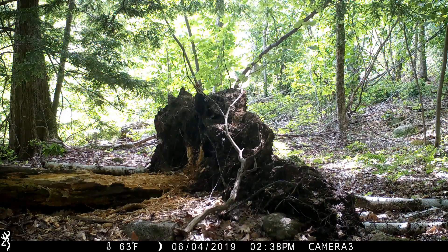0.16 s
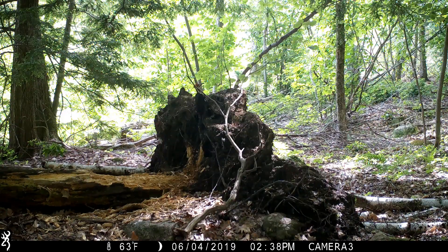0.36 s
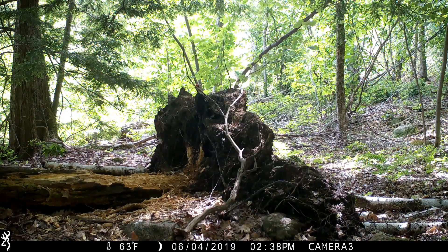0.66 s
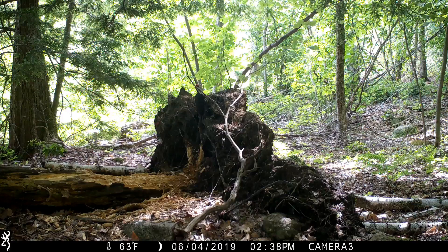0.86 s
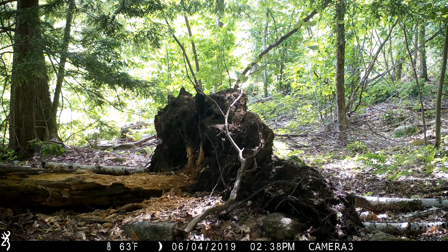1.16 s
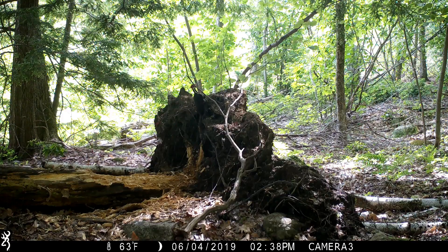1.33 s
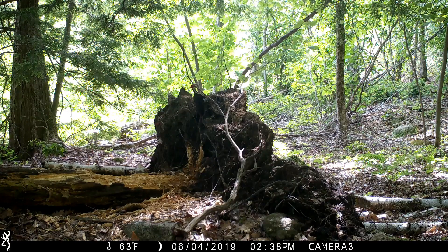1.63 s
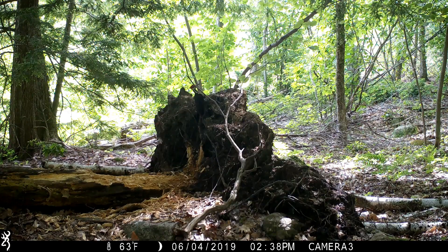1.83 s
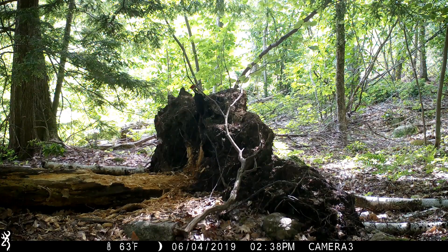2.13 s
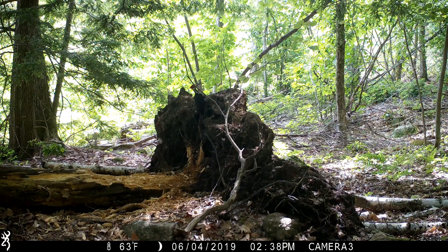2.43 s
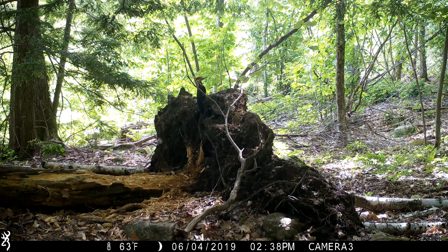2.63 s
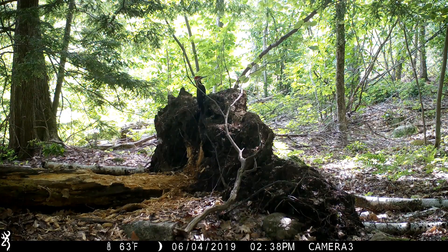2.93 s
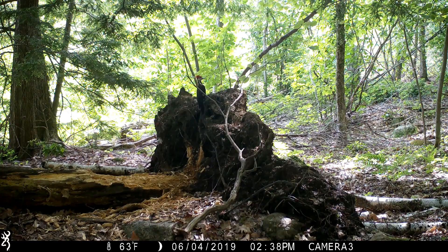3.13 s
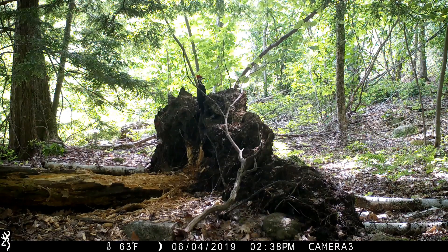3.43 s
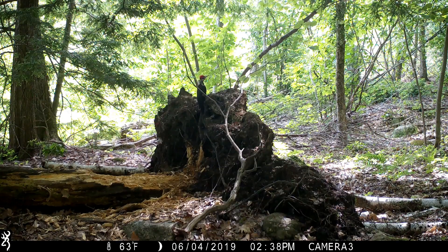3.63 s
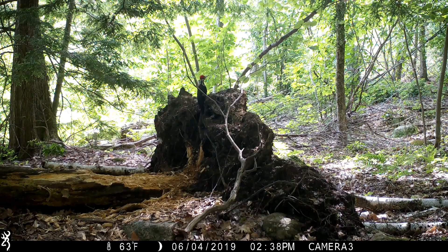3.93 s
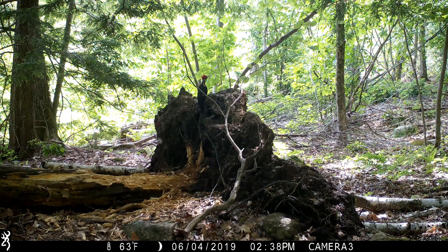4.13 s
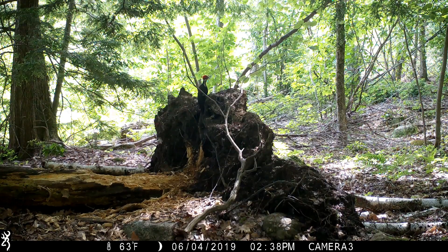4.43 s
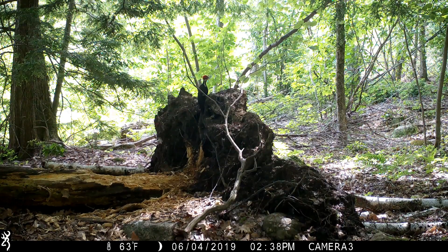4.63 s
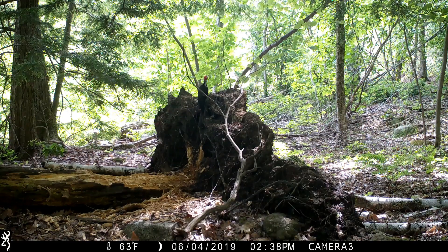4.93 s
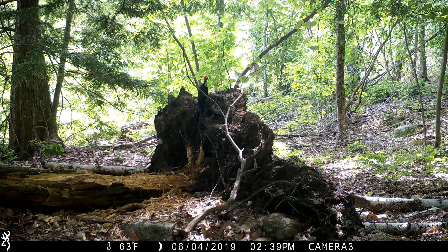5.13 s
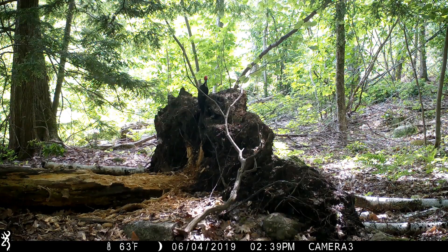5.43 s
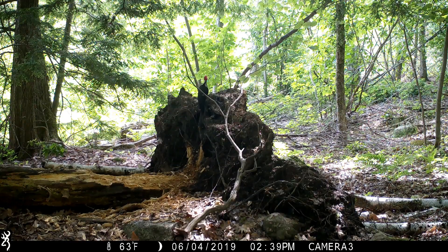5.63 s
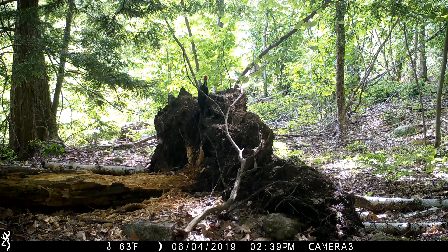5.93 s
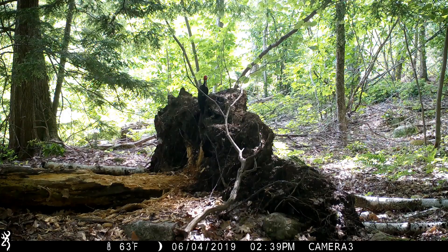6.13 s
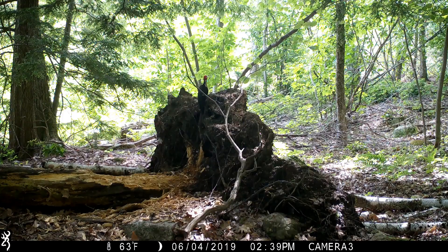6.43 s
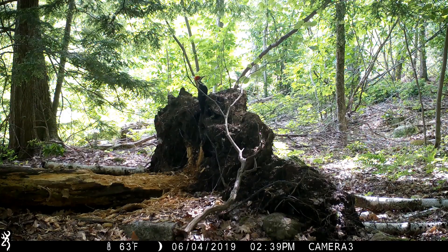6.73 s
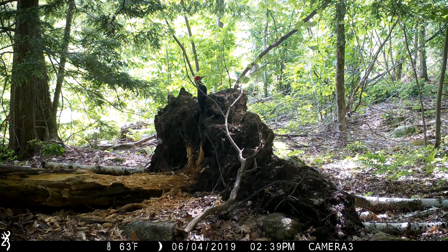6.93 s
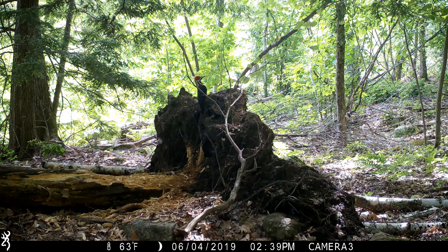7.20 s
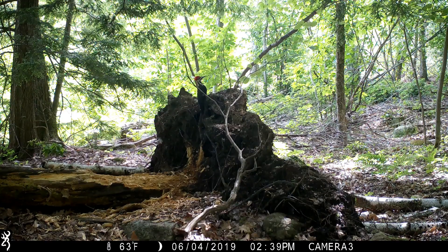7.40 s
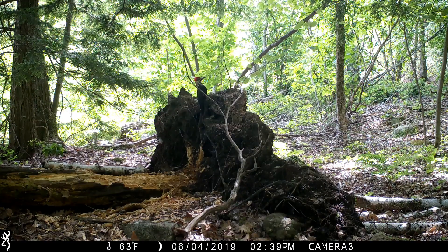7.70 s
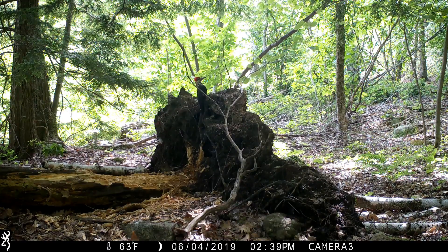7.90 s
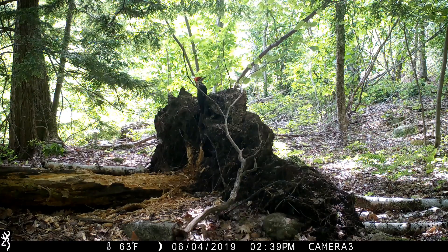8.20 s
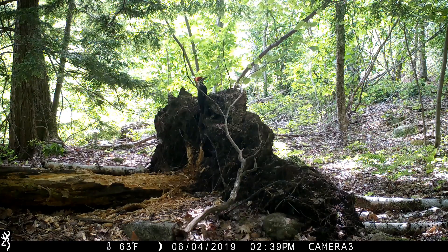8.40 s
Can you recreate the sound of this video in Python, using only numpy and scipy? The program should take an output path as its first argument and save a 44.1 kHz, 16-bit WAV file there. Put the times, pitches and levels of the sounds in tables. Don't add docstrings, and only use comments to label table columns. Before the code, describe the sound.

After faint hiss, distant bird whistles and tiny twig snaps, a large woodpecker gives a loud, rapid, even series of arched notes echoing among trees.

```python
import sys
import numpy as np
from scipy import signal
from scipy.fft import rfft, irfft, next_fast_len
from scipy.io import wavfile
from scipy.ndimage import uniform_filter1d, map_coordinates

SR = 44100
rng = np.random.default_rng(int(sys.argv[2]) if len(sys.argv) > 2 else 0)


def magnitude_from_level(level_db):
    exponent = np.asarray(level_db, float) / 20
    return 10 ** exponent


def wav_out(sig):
    wavfile.write(sys.argv[1], SR, np.round(np.clip(np.atleast_2d(sig).T, -1, 1) * 32767).astype(np.int16))


N = 377496
SAMPLING_HZ = 8000

# start [t/s], top pitch [f/Hz], fundamental [level/dB],
# octave over the fundamental [level/dB], which tells how forceful the note is
CALL_NOTES = [(3.1181, 1055, -24, -5), (3.4293, 1000, -23.5, -6.5), (3.6356, 997.3, -22.5, -1.5),
              (3.8359, 993, -21.5, -1.1), (4.016, 997, -23.5, 1.5), (4.201, 986, -23.5, 0.5),
              (4.3844, 995, -22.5, -0.1), (4.5665, 1000, -23.5, 1), (4.7552, 1000, -22.5, 0.5),
              (4.937, 1001, -23, 2.5), (5.1193, 1007, -23, 2), (5.291, 1010, -22.5, 1.5),
              (5.463, 1010, -22.5, 2.5), (5.6365, 1004, -22.5, 2), (5.8104, 991, -22.5, 1.5),
              (5.9947, 987, -23.5, 3), (6.1705, 1000, -22.5, 3), (6.353, 987, -23, 3.5),
              (6.529, 999, -23, 3), (6.6958, 1002, -23, 4.5), (6.8669, 994, -23, 3), (7.037, 996, -23.5, 4),
              (7.2091, 991, -23, 3.5), (7.384, 981.4, -23.5, 3), (7.5523, 994, -23, 3.5),
              (7.7252, 981, -23.5, 3), (7.9014, 984, -23, 3), (8.078, 982, -22, 2.5),
              (8.2498, 1000, -21.5, 3.5), (8.4347, 984, -22.5, 2)]


def rms_one(x):
    return x / np.sqrt(np.mean(x ** 2) + 1e-20)


def wobble(hz, size):
    r = np.exp(-2 * np.pi * hz / SR)
    noise = rng.standard_normal(size + 2000)
    return rms_one(signal.lfilter([1], [1, -2 * r, r * r], noise)[2000:])


def resonance(x, hz, width):
    r = np.exp(-np.pi * width / SR)
    ring = [1, -2 * r * np.cos(2 * np.pi * hz / SR), r * r]
    return signal.lfilter(np.array([1, 0, -1]) * (1 - r * r) / 2, ring, x)


def add(out, s, sound):
    i = round(s * SR)
    out[i:i + len(sound)] += sound[:N - i]


def air():
    # [f/Hz], strength per Hz [level/dB]
    air_colour = [(20, -2), (60, 0), (170, -3.5), (350, -6), (600, -8.5), (1000, -12.5), (1700, -15),
                  (2600, -18), (3500, -20), (3800, -22.5), (4000, -24.5)]
    hz = np.maximum(np.fft.rfftfreq(N, 1 / SR), 1)
    table_hz, table_db = np.transpose(air_colour)
    colour = magnitude_from_level(np.interp(np.log(hz), np.log(table_hz), table_db))
    colour *= (hz < SAMPLING_HZ / 2) / np.sinc(np.minimum(hz / SAMPLING_HZ, 0.5)) ** 2
    hiss = rms_one(irfft(colour * rfft(rng.standard_normal(N)), N))
    return magnitude_from_level(-44.9 + 0.74 * wobble(1.2, size=N)) * hiss


def songbird():
    # start [t/s], length [t/s], first and last pitch [f/Hz], [level/dB]
    slurs = [(0.34, 0.029, 3480, 3150, -52), (0.377, 0.056, 3380, 3900, -55),
             (0.479, 0.045, 2910, 2740, -52), (0.515, 0.016, 3010, 2770, -50),
             (0.552, 0.045, 2570, 3260, -53), (.555, 0.043, 3460, 4000, -51.5),
             (0.586, 0.031, 3420, 3445, -51), (0.655, 0.022, 3520, 3360, -53),
             (1.425, 0.03, 4000, 3530, -50.5), (1.438, 0.0234, 3510, 3490, -51),
             (1.825, 0.028, 2960, 2560, -52), (1.864, 0.047, 3360, 3670, -49),
             (1.912, 0.053, 3550, 2540, -45.5), (1.983, 0.014, 2800, 2520, -47),
             (2.087, 0.0457, 2970, 2440, -47.5), (2.16, 0.02, 2660, 3300, -46),
             (2.179, 0.0132, 3230, 2630, -45), (2.189, .032, 2540, 2170, -57),
             (2.15, 0.026, 3540, 3900, -49), (2.18, 0.021, 3940, 3540, -57),
             (2.236, 0.023, 2540, 2610, -56), (3.616, 0.043, 3240, 3430, -47),
             (3.711, 0.04, 3090, 3370, -46), (4.83, 0.05, 2610, 2800, -54)]
    out = np.zeros(N)
    for s, length, start_hz, end_hz, db in slurs:
        u = np.linspace(0, 1, round(length * SR))
        hz = start_hz + (end_hz - start_hz) * u
        swell = np.sqrt(2 * np.sin(np.pi * u))
        add(out, s, swell * magnitude_from_level(db) * np.sin(2 * np.pi * np.cumsum(hz) / SR))
    leaf_flutter_db = 2.0
    return out * magnitude_from_level(leaf_flutter_db * wobble(120, size=N))


def woods(x, count=5):
    # delay [t/s], time to fade by 60 dB [t/s], [level/dB]
    trunks = [
        (0.035, 0.013, -20),
        (0.024, 0.7, -21),
        (0.061, 0.94, -26),
        (0.051, .06, -29),
        (0.17, 0.065, -42.5),
    ]
    # [f/Hz], [level/dB]
    echo_colour = [(500, -9), (1000, 0), (1350, -2), (1750, 1.5), (1980, 1), (2600, 4.5), (3900, 6.5),
                   (6000, -6.5)]
    forest_floor = (0.009, 0.1, -12)
    t = np.arange(2 ** 15) / SR
    envelope = 0
    for delay, t60, db in [forest_floor, *trunks]:
        cluster = magnitude_from_level(-120 * t / t60) * (1 - np.exp(-t / 0.001))
        cluster = np.interp(t - delay, t, cluster, left=0)
        envelope = envelope + magnitude_from_level(2 * db) * cluster / cluster.sum()

    shifting = 0.37
    noise = rng.standard_normal((count + 1, len(t)))
    pattern = np.sqrt(1 - shifting) * noise[0] + np.sqrt(shifting) * noise[1:]
    responses = np.sqrt(envelope) * pattern
    pose = np.interp(np.arange(N) / SR, [CALL_NOTES[0][0], CALL_NOTES[-1][0]], [0, count - 1])
    weights = np.clip(1 - np.abs(pose - np.arange(count)[:, None]), 0, 1)

    size = next_fast_len(N + len(t))
    colour = magnitude_from_level(np.interp(np.fft.rfftfreq(size, 1 / SR), *np.transpose(echo_colour)))
    echoes = np.sum(rfft(x * weights, size) * rfft(responses, size), axis=0)
    return irfft(colour * echoes, size)[:N]


def ticks(t60=0.015):
    # [t/s], peak [level/dB]
    snaps = [
        (0.4234, -47),
        (1.186, -44),
        (2.9151, -37.5),
    ]
    out, t = np.zeros(N), np.arange(600) / SR
    for s, db in snaps:
        noise = resonance(rng.standard_normal(len(t)), 3300, 4000)
        add(out, s, magnitude_from_level(db + 15 - 60 * t / t60) * noise)
    return out


def shape(t, top_hz, force):
    # [f/Hz], [level/dB]
    low_passage = [(680, -23), (750, -18), (820, -14.5), (870, -4.5), (920, -1.5), (980, -0.33),
                   (1060, -1.2)]
    # [f/Hz], [level/dB]
    high_passage = [(1350, -4.5), (1470, -2.1), (1620, 2), (1730, 0), (1800, -14), (1850, -3), (1950, 2.03),
                    (2100, 0.5)]

    def blend(full, gentle):
        return force * full + (1 - force) * gentle

    rise, fall = blend(0.0283, 0.025), blend(0.0268, 0.036)
    before = np.clip(1 - t / rise, 0, 1)
    after = np.maximum(t - rise, 0) / fall

    leap = 0.13 * (1 + np.tanh((before - 0.41) / 0.088)) / 2
    climb = blend(0.21 * before ** 1.6 + leap, 0.3 * before ** 2)
    below = climb + 0.29 * after ** 1.5
    pitch = top_hz * (1 - below)

    opening = 5000 * np.minimum(t - 0.0025, 0)
    open_db = opening + 13500 * np.minimum(rise + fall - 0.0018 - t, 0)

    first = open_db + np.interp(pitch, *np.transpose(low_passage))
    first += blend(-4, 1) * (after - before)
    second = open_db + np.interp(2 * pitch, *np.transpose(high_passage))
    second += 2.82 * (after - before) + blend(0, -13) * before
    upper = open_db + 2.5 - blend(18, 59) * below
    upper += force * -2.5 * after + blend(0, -1.5)
    return uniform_filter1d([pitch, first, second, upper], size=130, axis=1, mode="nearest")


def woodpecker(jitter=0.0049, shimmer_db=0.98):
    # multiple of the pitch [1], level under the octave [level/dB]
    upper_partials = [(3, -14), (4, -14), (5, -14.5), (6, -19)]
    # [f/Hz], [level/dB]
    beak = [(1900, 3.5), (2500, 2), (2800, -1.5), (3000, -6.5), (3250, -6), (3550, -1.5), (3980, 3.5),
            (4200, -1), (4600, 5), (5000, -27.5)]
    # [f/Hz], width [f/Hz], [level/dB]
    throat = [
        (1325, 190, -0.5),
        (1650, 17, -5),
        (1739, 24, -23.5),
    ]
    gentle_db, full_db = -7, 1.5
    lead = 0.005
    out = np.zeros(N)
    t = np.arange(round(15 * lead * SR)) / SR - lead
    shake_hz, shake_db = wobble(73, size=N), wobble(140, size=N)

    for s, top_hz, level_db, octave_db in CALL_NOTES:
        force = np.clip((octave_db - gentle_db) / (full_db - gentle_db), 0, 1)
        arch_hz, first, second, upper = shape(t, top_hz, force)
        here = slice(round(s * SR), round(s * SR) + len(t))
        pitch = arch_hz * (1 + jitter * shake_hz[here])
        cycles = np.cumsum(pitch) / SR
        note = magnitude_from_level(first) * np.sin(2 * np.pi * cycles)
        note += magnitude_from_level(second + octave_db) * np.sin(2 * np.pi * (2 * cycles + rng.random()))
        for multiple, db in upper_partials:
            colour_db = np.interp(multiple * pitch, *np.transpose(beak))
            colour_db += 3 * wobble(60, size=len(t))
            chance_db = 0.83 * (rng.random() - 0.5)
            gain = magnitude_from_level(upper + db + 0.47 * octave_db + colour_db + chance_db)
            note += gain * np.sin(2 * np.pi * (multiple * cycles + rng.random()))
        loudness = np.sqrt(2) * magnitude_from_level(level_db + shimmer_db * shake_db[here])
        add(out, s - lead, loudness * note)

    rings = sum(magnitude_from_level(db) * resonance(out + 1e-18, hz, width) for hz, width, db in throat)
    return out + rings


def scene():
    near, far = woodpecker(), songbird()
    echoes = woods(near + magnitude_from_level(3) * far)
    return (near + far + echoes + ticks() + air())[None]


def low_pass(x):
    return signal.sosfilt(signal.butter(12, 15720, fs=SR, output="sos"), x)


def record(dry):
    t = np.arange(N) / SR
    weak_filter = signal.butter(4, 4250, fs=SR, output="sos")
    filtered = signal.sosfilt(weak_filter, dry[0])
    ticks_of_clock = np.arange(-1, int(N / SR * SAMPLING_HZ) + 2)
    sample_s = (ticks_of_clock + 0.7) / SAMPLING_HZ
    samples = map_coordinates(filtered, [sample_s * SR], order=3, mode="nearest")
    mix = np.interp(t, sample_s, samples)[None]
    return low_pass(mix)


dry = scene()
out = record(dry)
wav_out(out)
```